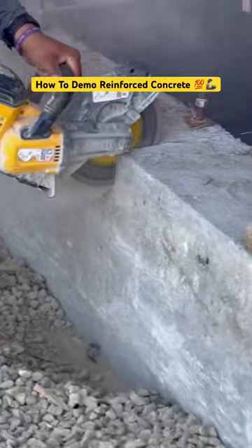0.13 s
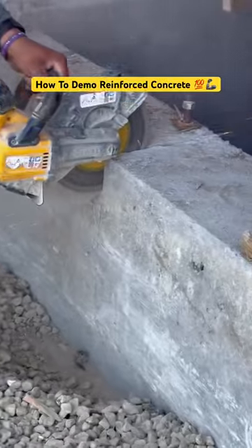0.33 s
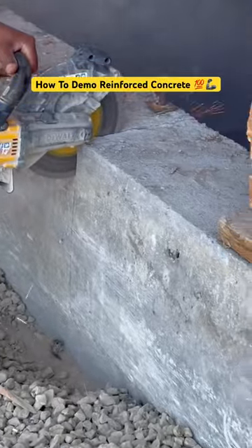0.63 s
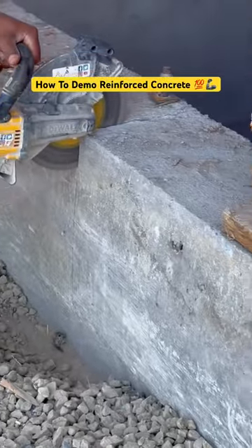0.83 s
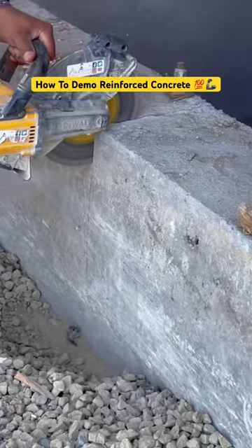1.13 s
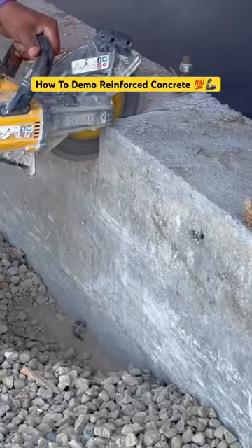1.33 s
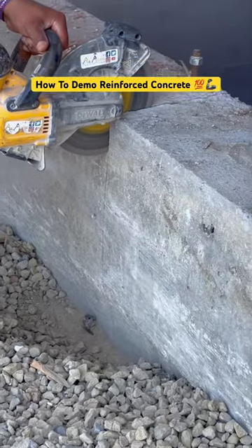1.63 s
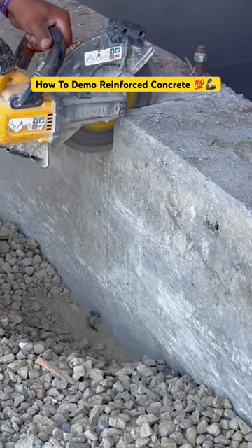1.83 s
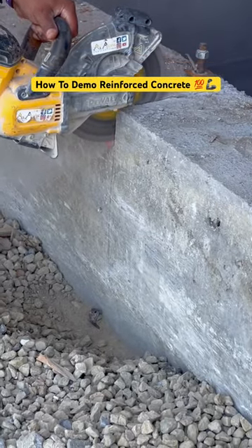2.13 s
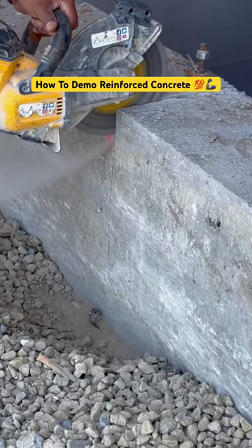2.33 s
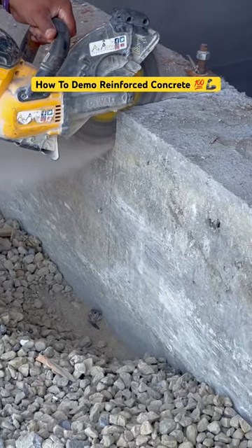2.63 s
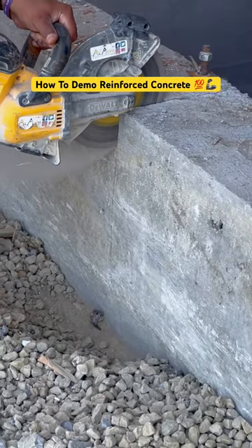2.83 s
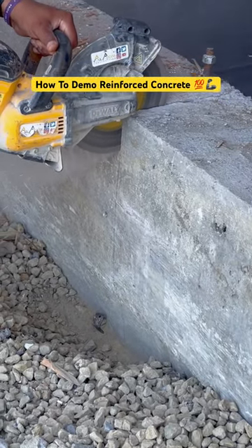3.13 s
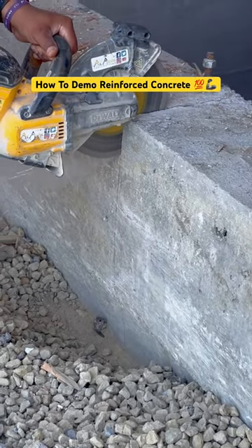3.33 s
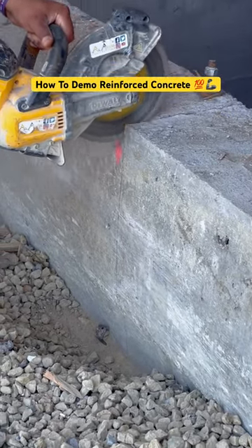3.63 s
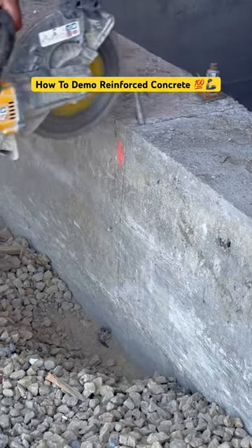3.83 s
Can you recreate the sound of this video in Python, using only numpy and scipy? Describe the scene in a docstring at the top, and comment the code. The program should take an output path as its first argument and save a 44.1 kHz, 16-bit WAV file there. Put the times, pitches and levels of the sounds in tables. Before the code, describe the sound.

A handheld power saw grinds concrete, close and outdoors, opening abruptly at 0.04 s. Dense bright grit, a rough buzzing drone and shimmering metallic treble continue, with short squeals and judder thickest before 1.9 s. Pitch climbs around 2.0-2.3 s, then sinks as the disc labours until 3.4 s. Grinding weakens from 3.5 s and drops away near 3.75 s, leaving an airy whir and gear whine falling in pitch, still running at 4 s.

```python
"""Power saw in a concrete wall

Outdoors, close to the microphone: a handheld power saw cuts concrete, over rumble, growl and whir.
The uneven rim scrapes once per turn as lines at multiples of the turn rate; random grains crush under it.
Resonances colour both, tones squeal and judder, and narrow bands of noise give the treble a tonal shimmer.
The disc speeds up as the push eases, labours as it bites again, then lifts out and starts to coast down."""
import sys
import numpy as np
from scipy import signal
from scipy.fft import rfft, irfft
from scipy.io import wavfile

SR = 44100
rng = np.random.default_rng(int(sys.argv[2]) if len(sys.argv) > 2 else 0)


def unload_audio(sound):
    """Save the sound as a 16-bit wav file, at the path given as the first command line argument."""
    columns = np.transpose(np.atleast_2d(sound))
    # keep every value between -1 and 1, then stretch to whole-number steps
    steps = np.round(np.clip(columns, -1, 1) * 32767)
    wavfile.write(sys.argv[1], SR, steps.astype(np.int16))


N = 176400
T = np.arange(N) / SR
FREQS = np.maximum(np.arange(N // 2 + 1) * SR / N, 1)


def from_db(db):
    """Decibels to gain."""
    return 10 ** (np.asarray(db) / 20)


def unit_power(x):
    """Scale to unit power."""
    return x / np.sqrt(np.mean(x ** 2) + 1e-20)


def in_time(rows):
    """A curve read at every sample."""
    return np.interp(T, *np.transpose(rows))


def at_hz(points, hz):
    """Read a spectrum on a log-frequency axis."""
    f, value = np.transpose(points)
    return np.interp(np.log(hz), np.log(f), value)


def drift(rate_hz):
    """Slow chance with spread 1: noise through two equal low-pass poles, drawn every 100 samples."""
    step, settle = 100, 1000
    pole = np.exp(-2 * np.pi * rate_hz * step / SR)
    noise = rng.standard_normal(N // step + 2 + settle)
    slow = signal.lfilter([1], [1, -2 * pole, pole * pole], noise)[settle:]
    return np.interp(np.arange(N) / step, np.arange(len(slow)), unit_power(slow))


def rough_drift(depth, rate_a_hz, rate_b_hz):
    """A complex factor around 1 that makes a tone waver in level and phase."""
    return 1 + depth * (drift(rate_a_hz) + 1j * drift(rate_b_hz))


def shaped(x, gain_db):
    """Apply a gain for each frequency."""
    return irfft(rfft(x) * from_db(gain_db), N)


def coloured(x, spectrum):
    """Give a sound a broad colour, at unit power."""
    return unit_power(shaped(x, at_hz(spectrum, FREQS)))


# Far down in the mix, the low rumble before its trim: (time [s], level [dB])
RUMBLE_LEVEL = [(.05,-57),(.3,-64),(.4,-75),(.6,-77),(1.5,-82),(1.7,-71),(2.0,-77.5),(2.4,-73),(2.5,-61),(2.65,-67),(2.78,-80),(3.5,-75),(3.7,-72.5),(4,-68.5)]
# Colour of the rumble: (frequency [Hz], relative level [dB per Hz])
RUMBLE_COLOUR = [(25,-28),(52,-8),(75,2),(110,-8.5),(200,-7),(400,-41),(700,-47)]
# Low growl from the cut: (time [s], level [dB])
GROWL_LEVEL = [(.05,-57),(.35,-54.5),(.52,-67.5),(1.6,-74.5),(1.8,-61),(2.3,-55),(2.6,-56),(2.85,-68),(3.3,-77),(4,-64)]
# Colour of the growl: (frequency [Hz], relative level [dB per Hz])
GROWL_COLOUR = [(60,-45),(150,-10.5),(240,-0.5),(360,4.5),(480,-2),(800,-24)]
RUMBLE_TRIM_DB = 4


def rumble_and_growl():
    """Two bands of low noise, each following its own level curve."""
    rumble = coloured(rng.standard_normal((2, N)), RUMBLE_COLOUR)
    growl = coloured(rng.standard_normal((2, N)), GROWL_COLOUR)
    return from_db(RUMBLE_TRIM_DB + in_time(RUMBLE_LEVEL)) * rumble + from_db(in_time(GROWL_LEVEL)) * growl


# Turn rate of the disc before its small jitter: (time [s], speed [turns per s])
DISC_SPEED = [(0.05,76.7),(.35,75.9),(.56,74.9),(.85,75.1),(1,76),(1.14,77.5),(1.3,77.8),(1.6,76),(1.84,75.7),(1.91,77.4),(2.1,87),(2.32,90),(2.47,88.8),(2.68,83.7),(2.88,81.3),(3.18,76.7),(3.41,72.3),(3.6,74.5),(3.7,73),(3.78,73.4),(3.85,68.5),(3.91,63),(4,59.5)]
SPEED_JITTER, JITTER_HZ = 0.0012, 12.2   # share of the speed, rate


def disc_speed():
    """The disc's turn rate over time, with a little chance unevenness."""
    return in_time(DISC_SPEED) * (1 + SPEED_JITTER * drift(JITTER_HZ))


# Multiples of the turn rate that stand out or stay back: (multiple, lift [dB])
STRONG_ORDERS = [(8,-5.5),(9,-3.5),(10,-3.5),(12,0.5),(16,-3.5),(17,-2),(21,6.5),(24,0),(26,4),(29,2.5),(32,1.5),(34,3.5)]
RIM_WEAR_HZ, RIM_ROUGH = 3.44, 1.53   # rate of change (at the tenth multiple), depth
# Above this speed the rim skips and its drone turns ragged
SLIP_FROM_TURNS_PER_S, SLIP_PER_TURN_RATE, SLIP_HZ = 76.4, 0.13, 41


def rim_bumps(turns, speed, count=72):
    """Bumps that repeat every turn and slowly change: wavering lines at multiples of the turn rate."""
    out = np.zeros((2, N))
    lifts = {round(k): db for k, db in STRONG_ORDERS}
    slip = np.clip(SLIP_PER_TURN_RATE * (speed - SLIP_FROM_TURNS_PER_S), 0, 1)
    for k in range(1, count + 1):
        wear_hz = RIM_WEAR_HZ * np.sqrt(k / 10)   # finer bumps change faster
        phase = 2 * np.pi * k * turns + slip * drift(SLIP_HZ)
        line = np.exp(1j * phase) * rough_drift(RIM_ROUGH, wear_hz, wear_hz)
        start_phases = np.exp(2j * np.pi * rng.random((2, 1)))
        out += from_db(lifts.get(k, 0)) * (line * start_phases).real
    return out


# Air and gear noise of the running saw: (frequency [Hz], relative level [dB per Hz])
WHIR_COLOUR = [(60,-34),(300,-17.5),(600,-4),(1000,-4),(1400,-2),(1950,7),(2450,0),(2900,5.5),(4500,-1.5),(6700,0.5),(9300,-21),(11300,-0.5),(14000,-25),(16000,-39)]
# Gear whine, heard once the disc runs free: (time [s], level [dB])
GEAR_WHINE = [(3.6,-70),(3.7,-48),(3.78,-53),(3.84,-52),(3.88,-57),(3.925,-40),(3.96,-50),(4,-57)]
GEAR_TEETH = 16
WHIR_DB, WHIR_DB_PER_DOUBLING = -44.5, 3.5   # level at the mean speed, rise per doubling of speed
WHIR_FLUTTER_DB, WHIR_FLUTTER_HZ = 0.96, 40
BUZZ_DB = -3.5   # the disc's buzz, weighed against its rushing air


def motor(speed, turns, bumps, rough=0.47):
    """Rushing air, the disc's buzz and the gear's whine, all tied to the speed."""
    rush = coloured(rng.standard_normal((2, N)), WHIR_COLOUR)
    buzz = from_db(BUZZ_DB) * coloured(bumps, WHIR_COLOUR)
    speed_db = WHIR_DB_PER_DOUBLING * np.log2(speed / speed.mean())
    flutter_db = WHIR_FLUTTER_DB * drift(WHIR_FLUTTER_HZ)
    air = from_db(WHIR_DB + speed_db + flutter_db) * unit_power(rush + buzz)
    mesh = np.exp(2j * np.pi * GEAR_TEETH * turns) * rough_drift(rough, 23, 30)
    return air + from_db(in_time(GEAR_WHINE)) * np.array([mesh.real, mesh.imag])


# The disc catches in the slot:
# (centre time [s], time to fall to 1/e^2 [s], frequency [Hz], peak level before roughness [dB])
SQUEALS = [(0.098,0.095,1880,-36.5),(0.09,0.06,2820,-41),(0.12,0.077,3400,-37),(0.14,0.06,5940,-34),(0.27,0.096,4490,-35),(0.488,0.044,4900,-31),(0.585,0.076,4880,-36),(0.57,0.098,8540,-33.5),(0.732,0.04,5192,-37),(0.857,0.38,4870,-40.5),(0.96,0.05,2850,-37),(1.04,0.055,1940,-37),(1.22,0.077,2630,-36),(1.23,0.15,3520,-41),(1.386,0.059,2630,-42),(1.971,0.04,2940,-41),(2.24,0.06,4270,-31.5),(2.499,0.1,4950,-39),(2.988,0.12,2220,-37.5),(3.01,0.05,2858,-37),(3.2,0.2,8360,-40),(3.546,.1,2620,-42.5),(3.75,0.05,2600,-47),(3.75,0.053,2930,-47),(3.746,0.068,2750,-43)]


def squeals(rough=0.4, rough_hz=40):
    """One disc mode swells and dies each time the steel rubs the side of the slot."""
    out = np.zeros((2, N))
    for centre, length, hz, db in SQUEALS:
        swell = from_db(db) * np.exp(-2 * ((T - centre) / length) ** 2)
        ring = np.exp(2j * np.pi * hz * T) * rough_drift(rough, rough_hz, rough_hz)
        out += swell * np.array([ring.real, ring.imag])
    return out


# The disc judders in the slot at a multiple of its turn rate:
# (start [s], end [s], multiple, centre level before waver [dB])
JUDDERS = [(0.018,1.92,8,-48),(0.02,1.0,10,-51.5),(1.28,1.89,10,-50),(0.02,0.197,17,-39.5),(0.506,0.96,17,-46),(0.14,1.38,16,-51),(1.44,1.8,16,-47.5),(1.06,1.42,14,-54),(0.44,0.83,26,-42.5),(0.75,1.16,29,-47),(1.6,1.8,32,-42.5),(0.875,1.06,6,-56.5),(2.1,2.52,3,-62),(2.48,2.71,7,-48.5),(2.75,3.05,16,-48.5),(2.9,3.1,15,-46),(3.33,3.47,12,-47)]
JUDDER_FADE_S = 0.032


def judders(turns, rough=0.24, rough_hz=18, side_share=0.46):
    """Wavering tones locked to the rotation while the disc bounces in the slot."""
    out = 0
    for start, end, multiple, db in JUDDERS:
        held = np.clip(np.minimum(T - start, end - T) / JUDDER_FADE_S, 0, 1)
        tone = np.exp(2j * np.pi * round(multiple) * turns) * rough_drift(rough, rough_hz, rough_hz)
        out = out + from_db(db) * held * tone
    return np.sqrt(2) * np.array([out.real, side_share * out.imag])


# Resonances of guard and disc: (frequency [Hz], width [Hz], lift [dB])
GUARD_AND_DISC_MODES = [(600,89,5.5),(764,56,8.5),(1230,53,9),(1976,28,3.5),(2632,69,10.5),(2913,71,8),(3630,53,5),(4540,100,5.5),(4993,123,6.5),(5300,38,4.5),(6710,400,3),(7000,240,4),(8300,640,5),(9410,450,5.5),(10470,170,5.5),(11870,380,4.5),(13400,190,7),(14100,240,0),(15340,350,6.5)]
MODE_FLICKER_HZ = 1.9


def body(x, flicker):
    """Guard and disc ring; with flicker, each resonance comes and goes as the contact shifts."""
    spectrum, power, ringing = rfft(x), 1, 0
    for hz, width_hz, lift_db in GUARD_AND_DISC_MODES:
        bell = 1 / (1 + (2 * (FREQS - hz) / width_hz) ** 2)
        power = power + (from_db(lift_db) ** 2 - 1) * bell * np.sqrt(bell)
        if flicker:
            band = irfft(spectrum * bell, N) * (from_db(lift_db) - 1)
            ringing = ringing + flicker * drift(MODE_FLICKER_HZ) * band
    return unit_power(irfft(spectrum * np.sqrt(np.abs(power)), N) + ringing)


# Colour of the crushing grit, shared by the shimmer: (frequency [Hz], relative level [dB per Hz])
GRIT_COLOUR = [(100,-32),(400,-44),(500,-11.5),(1000,-11),(1450,-9.5),(1800,0),(2400,-9),(3300,-1.5),(4200,-1.5),(7500,1.5),(10000,-3.5),(13000,-0.5),(15800,-3.5)]
SHIMMER_LOW_HZ, SHIMMER_HIGH_HZ, BAND_DRIFT_HZ = 1801, 15543, 22
SHIMMER_DB, SWELL_DB, SWELL_HZ = -4.5, 6, 10.1   # level within the cut, swell depth and rate


def tonal_shimmer(count=130):
    """Narrow bands of noise at random places, each swelling and fading by chance: a tonal shimmer."""
    out = np.zeros((2, N))
    places = (np.arange(count) + rng.random(count)) / count
    for k, place in enumerate(places):
        angle = 2 * np.pi * (SHIMMER_LOW_HZ + place * (SHIMMER_HIGH_HZ - SHIMMER_LOW_HZ)) * T
        swell = from_db(SWELL_DB * np.minimum(drift(SWELL_HZ), 1.8))
        narrow_band = np.cos(angle) * drift(BAND_DRIFT_HZ) + np.sin(angle) * drift(BAND_DRIFT_HZ)
        out[k % 2] += swell * narrow_band
    return from_db(SHIMMER_DB) * body(coloured(out, GRIT_COLOUR), 0)


# The rim's once-per-turn drone within the cut, before its trim: (time [s], level [dB])
DRONE_LEVEL = [(.1,4),(.3,2),(1.2,0),(1.8,0),(2.0,2),(2.3,1.5),(2.6,2),(3.0,0),(3.4,-2.5),(3.55,-2.5),(4,14)]
# Colour of the rim's scraping: (frequency [Hz], gain [dB])
RIM_COLOUR = [(70,-47),(150,-28),(230,-17.5),(380,-32),(470,-5),(900,2.5),(1400,-3),(2000,2.5),(3000,1.5),(4500,8),(7000,-19)]
RIM_TRIM_DB = -11.5


def rim(bumps):
    """The uneven rim scrapes the slot and sets guard and disc droning."""
    return from_db(RIM_TRIM_DB + in_time(DRONE_LEVEL)) * body(coloured(bumps, RIM_COLOUR), 0)


GRIT_DB, MODE_FLICKER = -1.64, 0.4   # level within the cut, depth of the resonances' flicker
GRAINS_PER_S, GRAIN_SPREAD_DB = 22000, 2
TURN_SWING_DB, CHATTER_DB, CHATTER_HZ = 0.7, 0.93, 11.4


def grit(turns):
    """Dense grains crush under the rim, harder at some points of each turn."""
    sizes_db = GRAIN_SPREAD_DB * np.minimum(rng.exponential(1, (2, N)), 4)
    signs = rng.choice([-1, 1], (2, N))
    grains = from_db(sizes_db) * signs * (rng.random((2, N)) < GRAINS_PER_S / SR)
    high_spots = 0
    for k in range(1, 9):
        high_spots = high_spots + np.cos(2 * np.pi * k * turns + drift(RIM_WEAR_HZ) * np.pi)
    press = from_db(TURN_SWING_DB * unit_power(high_spots) + CHATTER_DB * drift(CHATTER_HZ))
    return from_db(GRIT_DB) * body(coloured(grains * press, GRIT_COLOUR), MODE_FLICKER)


# How hard the disc bites, as a level on grit, rim and shimmer together: (time [s], level [dB])
BITE_LEVEL = [(.05,-23.5),(.2,-25),(.6,-27),(.75,-27),(1.04,-27),(1.1,-28.5),(1.7,-28.5),(1.96,-28),(2.04,-31),(2.11,-31),(2.17,-25.5),(2.34,-28.5),(2.42,-26),(3.0,-25.5),(3.45,-26),(3.5,-29.5),(3.59,-29),(3.655,-36.5),(3.69,-32),(3.73,-34.5),(3.78,-52),(4,-67)]


def cut(turns, bumps):
    """The main source: grit, rim and treble shimmer all grow with the bite."""
    return from_db(in_time(BITE_LEVEL)) * (grit(turns) + rim(bumps) + tonal_shimmer())


# Gain on the side part, thin near 2300 and 4500 Hz: (frequency [Hz], gain [dB])
SIDE_GAIN = [(50,-9),(250,-3.5),(600,-1),(800,-0.5),(1300,1),(1900,-1.5),(2300,-12),(2800,0.5),(3400,-5),(4500,-18.5),(5200,0),(15000,-0.5)]
# Lean to the left: (frequency [Hz], left over right [dB])
LEFT_LEAN = [(200,1),(400,0),(700,2.7),(1300,0),(2300,0)]


def scene():
    """All layers as a centre and a side part, the side uneven in frequency, turned into left and right."""
    speed = disc_speed()
    turns = np.cumsum(speed) / SR
    bumps = rim_bumps(turns, speed)
    saw = motor(speed, turns, bumps) + squeals() + judders(turns) + cut(turns, bumps)
    mid, side = rumble_and_growl() + saw
    side = shaped(side, at_hz(SIDE_GAIN, FREQS))
    lean_db = at_hz(LEFT_LEAN, FREQS) * np.array([[.5], [-.5]])   # half up on the left, half down right
    return shaped([mid + side, mid - side], lean_db)


START_S, ATTACK_S, FLOOR_DB = 0.038, 0.018, -78
CUTOFF_HZ = 15750


def record(dry):
    """The sound opens abruptly out of near silence; the top is cut steeply."""
    opening = np.clip((T - START_S) / ATTACK_S, 0, 1) ** 2
    top = 1 / np.sqrt(1 + (FREQS / CUTOFF_HZ) ** 300)
    return irfft(rfft(dry * np.maximum(opening, from_db(FLOOR_DB))) * top, N)


dry = scene()
out = record(dry)
unload_audio(out)
```